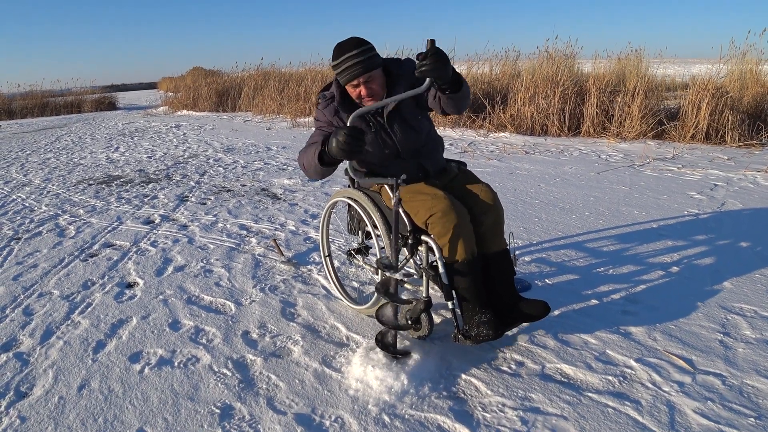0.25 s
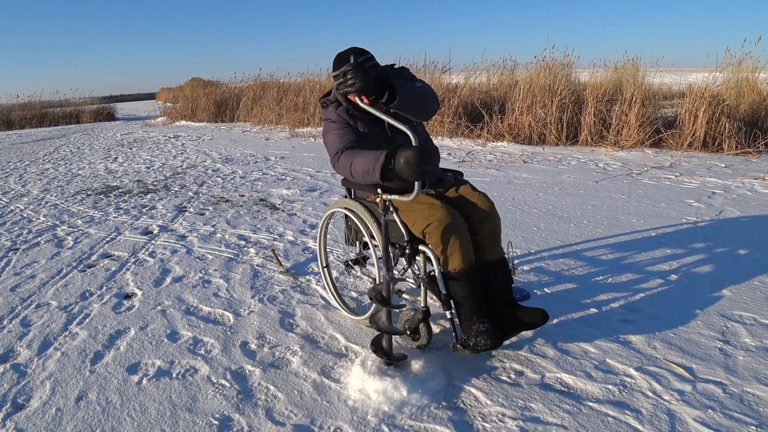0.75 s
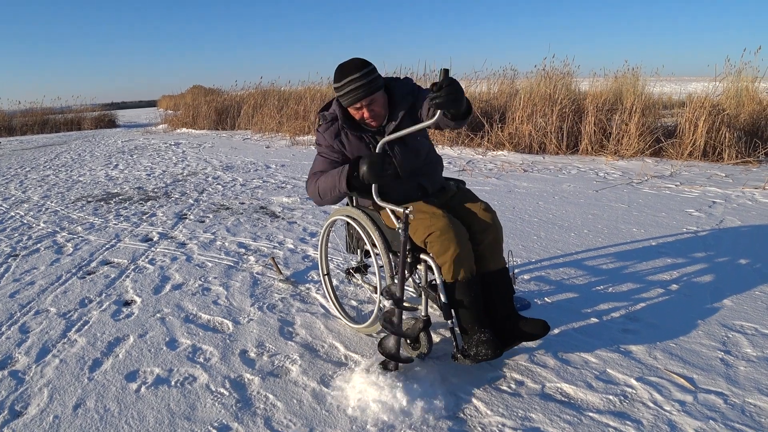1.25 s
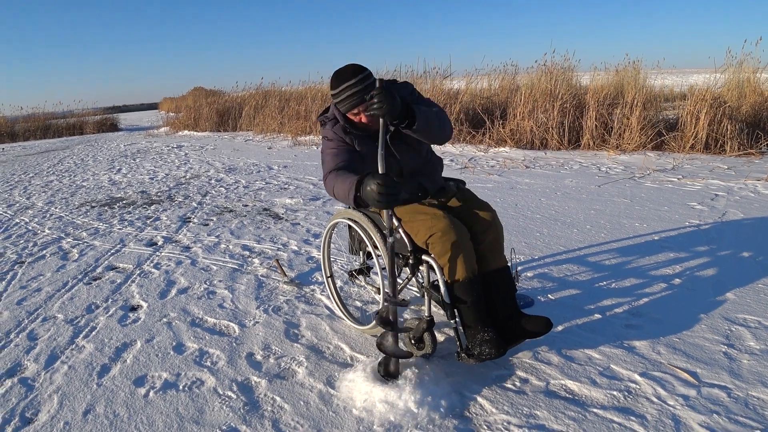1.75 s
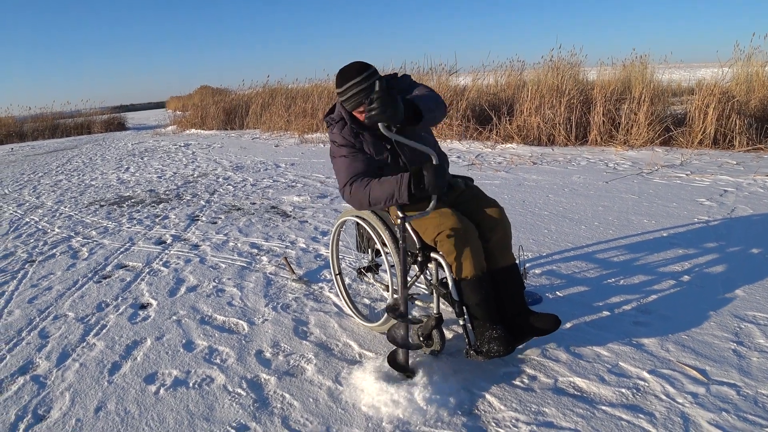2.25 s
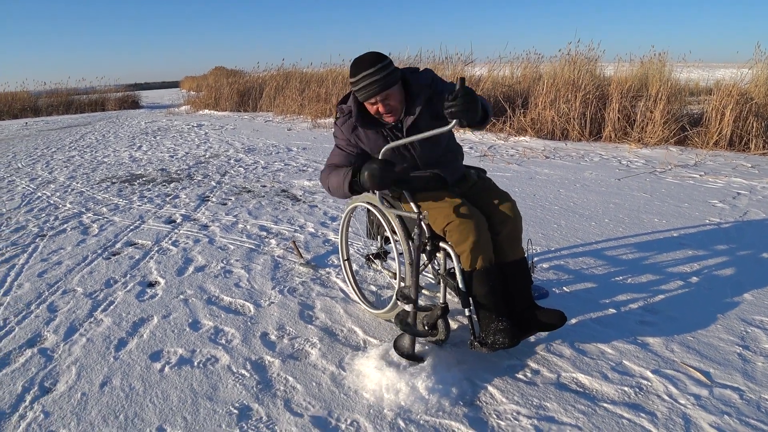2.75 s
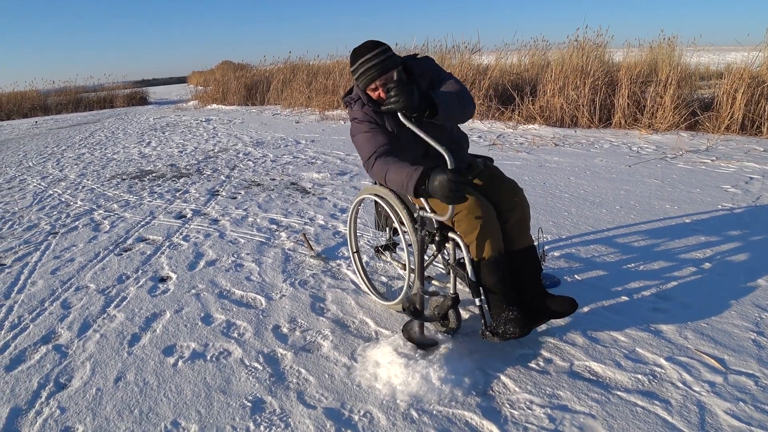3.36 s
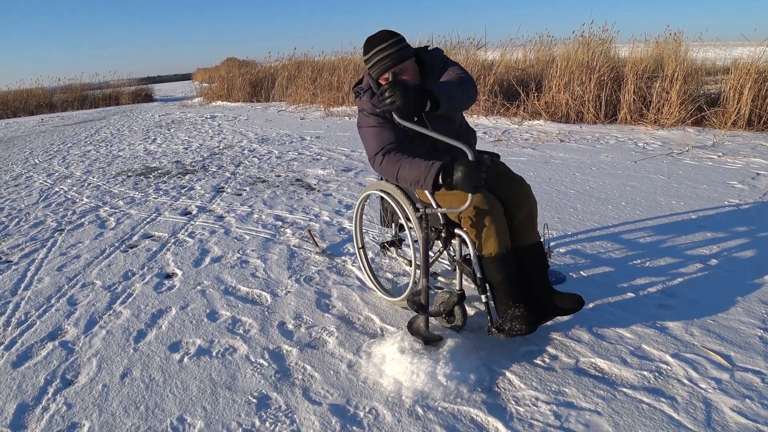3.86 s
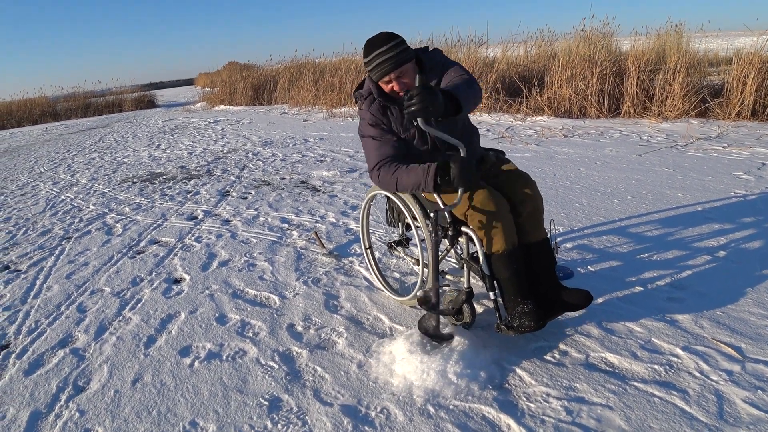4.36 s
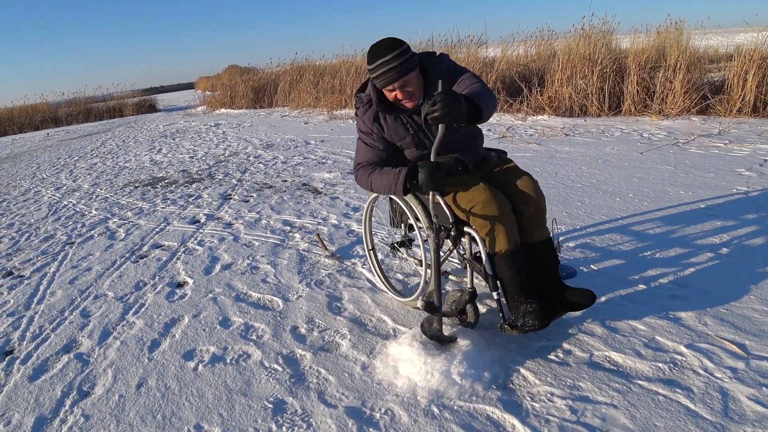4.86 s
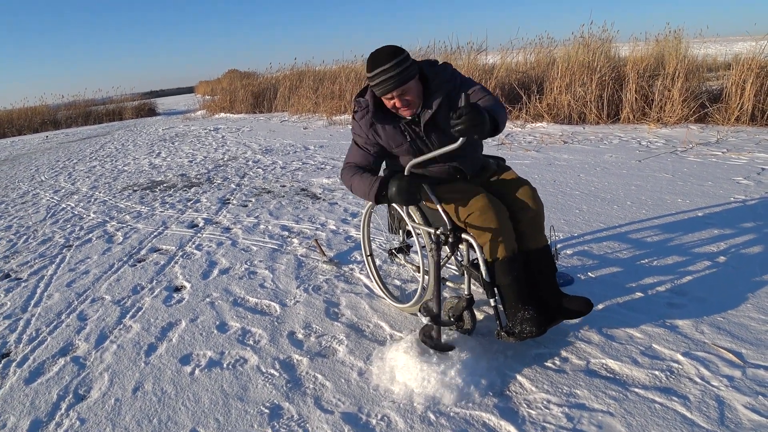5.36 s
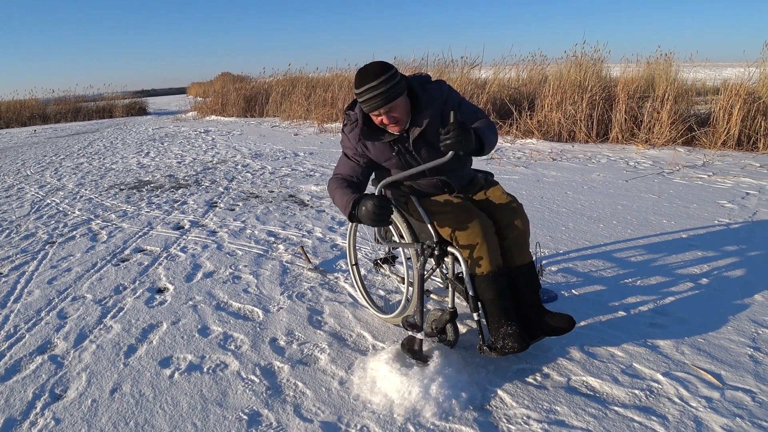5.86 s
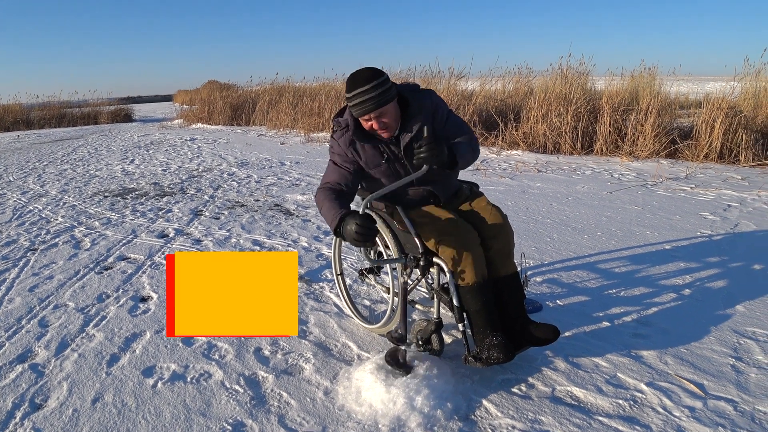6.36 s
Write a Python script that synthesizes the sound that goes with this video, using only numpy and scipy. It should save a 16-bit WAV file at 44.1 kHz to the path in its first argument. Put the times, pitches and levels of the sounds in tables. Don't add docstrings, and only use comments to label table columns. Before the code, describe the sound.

A hand-cranked auger cuts thick river ice in the open, heard dry from a few steps away, nearly centred. From 0 s a dense, heavy scrape is already running: thousands of tiny fractures merging into gritty crunch, with hollow metallic resonance around 1-2 kHz, brighter crackle at 3-7 kHz and airy ice-dust hiss above. It pulses gently every 0.3-0.5 s as a blade passes, with uneven bites and slips. Faint handling bumps sit near 0, 0.7, 2.3 and 6 s. Larger snaps grow from about 1.8 s, strongest between 2.9 and 4.7 s, while a low hum and rumble underlie the strokes. The image leans slightly aside, most near 4.7 s. Breaking ice clusters thickly around 4.2-5.2 s; crisp splinters tick loudest near 5.55 s. Around 6 s chips crowd the hole, lowering its ringing note, with more crunching. Grinding continues to the end at 6.6 s.

```python
import sys
import numpy as np
from scipy import signal
from scipy.fft import rfft, irfft, next_fast_len
from scipy.io import wavfile
from scipy.ndimage import uniform_filter1d, minimum_filter1d, map_coordinates

SR = 44100
rng = np.random.default_rng(int(sys.argv[2]) if len(sys.argv) > 2 else 0)


def unload_audio(sound):
    columns = np.transpose(np.atleast_2d(sound))
    steps = np.round(np.clip(columns, -1, 1) * 32767)
    wavfile.write(sys.argv[1], SR, steps.astype(np.int16))


def boost(x):
    u = np.asarray(x, float) / 20
    return 10 ** u


N = 291501

# t/s, peak level/dB, f/Hz
SNAPS = [(0.3426, -18, 5940), (0.4207, -18, 3930), (0.628, -21, 6100), (0.786, -18, 5300),
         (0.97, -14, 5250), (1.11, -22, 5820), (1.293, -15, 3800), (1.393, -13, 5280), (1.845, -9, 4950),
         (1.8612, -17, 5460), (2.117, -13, 5060), (2.4244, -21, 3880), (2.4543, -11, 6000),
         (2.711, -12, 5700), (2.813, -14, 5950), (2.9398, -7, 5170), (3.1634, -18, 6630), (3.348, -8, 5030),
         (3.794, -7, 4780), (3.8306, -19, 4040), (4.182, -13, 5730), (4.249, -8, 5150), (4.685, -6, 4870),
         (5.087, -13, 5460), (5.2344, -21, 6340), (5.7657, -16, 4410), (5.799, -14, 4470),
         (6.0196, -20, 5950), (6.406, -19, 4660), (6.4284, -18, 5980)]
# f/Hz, width/Hz, level/dB shallow, level/dB halfway, level/dB deep, share of the blade swell [1]
SCREW_MODES = [(847, 132, -2.5, -3, 0.5, -0.058), (1017, 61, -3, -5, -1, -0.067),
               (1295, 98, 4, -1.5, -4, -0.076), (1576, 170, -3, 3, -0.5, -0.13),
               (1723, 235, -9, 2.5, 0, -0.94), (1945, 150, 4, 3.5, 5.5, 0.47), (2012, 280, -9, -1, 1.5, 1),
               (2870, 500, -19, 0, 6, 0.31), (3140, 530, -10, -4, -8.5, -0.65)]
FLIGHT_MODES = [(3380, 530, 4, -4, -4, 0.24), (3890, 260, 7.5, -5, -2, 0.13), (4410, 520, -7, 0, 5.5, 0.41),
                (4780, 390, -9, 3.5, 6.5, 0.054), (5370, 240, -5.5, 0.5, 1, -0.059),
                (5950, 310, 5, 3.5, 8, 0.19), (6510, 140, 0.5, -4, -1, -0.098),
                (7110, 570, -1, -10, -22, 0.19), (8550, 240, -11, -2, -12, 0.51)]
SHAFT_MODES = [(455.3, 31.6, 0, -6.5, -5.5, 0), (514.5, 77, -8, -4, -7.5, 0), (617, 44, -12, -4.5, -5, 0)]
HOLE, BLADE = (1147, 98), (2304, 226)  # f/Hz, width/Hz of each of two passes
# f/Hz, level/dB
BARE_CUT = [(300, -18), (400, -16), (700, -14), (1200, -4.5), (2500, 0), (3300, -15), (6500, -20.5),
            (9000, -32), (11500, -25), (15500, -51.5)]
# f/Hz, level/dB per Hz
SHEET_RUMBLE = [(40, -70), (85, -19), (130, -6.5), (190, -2), (240, 1.5), (320, -9), (420, -55)]
# f/Hz, left minus right level/dB
PORTS = [(100, 0), (200, -.4), (380, -1.7), (700, -1.9), (1290, -1.1), (1800, -.8), (2500, -2.6),
         (4400, -.7), (6000, -.9), (8120, -.3), (15000, 0)]
# f/Hz, level/dB under the centre
SCATTER = [(100, -40), (300, -31), (500, -23), (1800, -31), (2500, -21), (4500, -27), (5800, -21),
           (7000, -26), (8000, -20.5), (9500, -27), (11000, -16.5), (13000, -20)]
# t/s, share of the port balance [1]
PAN = [
    (0, .7),
    (2.5, .9),
    (4.7, 1.35),
    (5.6, .95),
    (6.61, .9),
]
# f/Hz, level/dB per Hz
DUST_HISS = [(4410, -13.5), (7500, -3), (10400, -7.5), (12500, -15.5), (14700, -14), (15600, -17)]
# t/s, peak level/dB, f/Hz
SPLINTERS = [(0.0513, -14.5, 8800), (0.4539, -11, 8560), (0.86, -14, 8800), (1.0111, -21, 8130),
             (1.027, -12, 8180), (1.3583, -10, 8260), (1.5259, -21, 8550), (1.8397, -21, 8070),
             (2.536, -10, 8360), (3.7045, -13, 8160), (4.2812, -18, 8870), (4.338, -22, 9000),
             (4.4074, -12, 8030), (4.5027, -14, 8960), (4.798, -12, 8900), (4.8274, -11, 9010),
             (5.2355, -26, 8600), (5.5515, -7, 9800), (5.568, -5, 9000), (5.689, -17, 8800),
             (5.9594, -16, 8900), (0.1331, -14, 10000), (2.1096, -17, 10500), (2.4284, -18, 10200),
             (3.047, -18, 9000), (3.9619, -14, 10900), (6.12, -21, 11000), (6.318, -22, 11400),
             (6.4083, -19, 9400)]
TOP_HZ = 15730
# t/s, jump level/dB
PLATES = [(0.053, 2), (0.0674, 10), (0.311, 13), (0.361, 9), (0.3766, 7), (0.5473, 6), (0.785, 7),
          (0.8605, 6), (1.0451, 6), (1.234, 5), (1.333, 8), (1.4322, 2), (1.4447, 7.5), (1.527, 2),
          (1.539, 4), (1.768, 5), (1.7765, 5), (1.989, 9), (2.3317, 1), (2.7554, 14), (2.7702, 7),
          (2.8276, 12), (2.8909, 4), (2.9567, 11), (3.016, 13), (3.1823, 5), (3.2875, 7), (3.3614, 13),
          (3.5839, 4), (3.718, -4), (3.8612, 8), (3.8925, 8), (4.127, 2), (4.226, 4), (4.2414, 5),
          (4.282, 15), (4.3012, 9), (4.3307, 4), (4.3401, 3), (4.408, 8), (4.487, 7), (4.5033, 2),
          (4.5316, 9), (4.7158, 12), (4.7512, 9), (4.787, 12), (4.9852, 7), (5.059, -2), (5.116, 13),
          (5.1593, 10), (5.1744, 15), (5.3453, 1), (5.6896, 8.4), (5.96, 13), (5.9967, 8), (6.029, 12),
          (6.0433, 8), (6.078, 16.5), (6.1211, 6.8), (6.2817, 1)]
# t/s, share of the lower tuning [1]
HOLE_SAG = [
    (0, 0.46),
    (4.5, 0.21),
    (5.2, 0.5),
    (5.7, 0.4),
    (6.05, 0.8),
    (6.25, 0.52),
    (6.6, 0.58),
]
SAG_HZ = 55
# lower f/Hz, upper f/Hz
PARTS_HZ = [(640, 950), (1300, 2150), (2700, 4000)]
# t/s, swell level/dB
HEEL_SWELLS = [(0.07, -6), (0.289, -0.5), (0.579, 4), (0.783, -3), (1.003, 4), (1.442, -2), (1.741, -3),
               (1.99, 3), (2.619, -7.4), (3.288, 6.8), (3.532, -4), (3.702, 5.5), (3.901, -5), (4.106, 1.5),
               (4.55, 5), (4.684, 2), (5.248, -4.5), (5.692, -9), (5.882, 4.5), (6.146, -11)]
WAIST_SWELLS = [(0.07, -2), (0.165, 3.5), (0.279, -2), (0.449, 3), (0.693, 0), (0.858, 3.5), (1.197, 4),
                (1.317, -1.7), (1.437, -4), (1.591, 3.5), (1.781, 0.5), (2.21, -1.6), (2.38, 2.5),
                (2.834, -3), (2.953, 4.5), (3.248, -1), (3.372, 4.5), (3.632, -4), (4.146, -5), (4.245, 2.3),
                (4.545, -2.9), (5.073, 1), (5.238, 1), (5.438, -1.5), (5.572, 3), (5.757, -1), (6.031, 4),
                (6.351, 0), (6.54, -1)]
RIM_SWELLS = [(0.584, -2), (1.023, 3.5), (1.152, 4), (1.232, 3), (1.502, -3), (1.576, 4), (1.916, 2.5),
              (2.854, -2), (3.098, 3), (3.168, -8), (3.238, 2.5), (3.417, -2), (3.512, 4), (3.642, 0.5),
              (3.956, -1), (4.031, 6.5), (4.45, 3), (4.689, 3), (4.784, -1), (4.914, 1), (4.994, -4),
              (5.093, 3), (5.268, -1.3), (5.443, -6), (5.632, 1.8), (5.797, 5), (5.897, -3), (6.006, -5),
              (6.276, 2), (6.361, -5), (6.475, 0), (6.61, -6)]
FLIGHT_SWELLS = [(0.09, -6), (0.429, -7), (0.823, -2.5), (1.142, -4.5), (1.237, 2), (1.347, -2),
                 (1.457, 2.0), (1.532, -4), (1.706, -5), (1.786, 2.5), (2.145, 1.5), (2.235, -4), (2.33, 3),
                 (2.554, 0.5), (2.629, -5), (2.759, 3), (3.288, -2), (3.367, 2.5), (3.442, -4.1),
                 (3.921, -4.5), (4.036, 1), (4.34, -4), (4.684, 1), (5.073, 3.5), (5.647, -3), (5.847, 0.5),
                 (6.031, 3), (6.126, -4), (6.321, 3.5), (6.48, 3), (6.61, -2.5)]
SHAFT_SWELLS = [(1.04, 7), (1.29, -5), (1.96, 7), (2.43, 6), (2.62, -5), (2.86, 4), (3.1, -5), (3.19, 5),
                (3.48, -6), (3.94, -9), (5.05, 2.8), (5.45, 4.5), (5.71, -3.8), (5.83, 3.5), (6.27, 4),
                (6.5, -10)]
# t/s, swell level/dB
DUST_DRIFTS = [
    (0.963, -5),
    (2.958, -6),
    (3.492, 2.5),
    (3.826, -4),
    (4.091, -3),
    (5.024, 3.5),
    (5.622, -3),
    (6.036, -3),
    (6.46, 2.8),
    (6.61, 4),
]
HALF_TURNS = [-0.37, 0.04, 0.43, 0.87, 1.28, 1.72, 2.15, 2.5, 2.89, 3.36, 3.74, 4.1, 4.45, 4.74, 5.09, 5.48,
              5.96, 6.39, 6.8]
# t/s, half length/s, coarse cut level/dB, fine cut level/dB
BITES = [(0.24, 0.025, -4.5, -2), (0.572, 0.023, -1, -3.5), (0.87, 0.27, 1, 0.5), (1.116, 0.028, -2, 1),
         (1.363, 0.028, 1.7, 3.5), (1.563, 0.25, -1, -2), (2.046, 0.035, -0.5, -2.5), (2.328, 0.2, 1, 1),
         (2.405, 0.019, -3, -3), (2.462, 0.021, 2.5, 3), (2.585, 0.009, 2.5, 1), (2.836, 0.014, 2.5, 5),
         (2.996, 0.024, -1.5, -3), (3.039, 0.02, 2, 1.5), (3.197, 0.15, -0.3, 0), (3.616, 0.026, 3, 2.5),
         (3.79, 0.023, -0.5, 1.5), (4.237, 0.049, 1, 3.5), (4.293, 0.024, -1.5, -3), (4.502, .058, 1, -1),
         (4.59, 0.02, -1, -3), (4.686, 0.019, 1, 4), (4.905, 0.13, 1.7, -0.8), (5.215, 0.017, -1.5, -4),
         (5.354, 0.048, -0.5, -2.5), (5.575, 0.013, 0, 6.5), (5.655, 0.067, -1.5, -2.5),
         (5.932, 0.021, 0, -4), (6.02, 0.036, 1.5, 3), (6.572, 0.022, 3, -0.5)]
# level/dB shallow, level/dB halfway, level/dB deep
DEPTH = dict(rim=(-30.5, -33, -32.5), scrape=(-23, -23, -24.5), chips=(-23, -26, -27),
         hole=(-39.5, -34, -30), blade=(-34.5, -30.5, -41.5), hum=(-30.5, -33.5, -34),
         rumble=(-55.5, -53, -51.5), dust=(-31, -33.5, -33), bumps=(-74, -73.5, -80))
# swing level/dB per blade pass, its lag [cycles],
# swing level/dB per push and pull of the arms, its lag [cycles]
CRANK = dict(scrape=(0.39, 0.058, .2, 0.25), chips=(0.24, -0.18, 0.23, 0.24),
         hole=(0.3, 0.28, 0.098, -0.21), blade=(0.78, .02, 0.26, 0.61), rim=(0.44, .01, 0.27, 0.12),
         hum=(0.15, -0.26, .15, -0.021), rumble=(.4, .07, 0.27, .32), dust=(0.25, -0.37, 0.25, -0.03),
         bumps=(1.4, .06, .45, .15))
FOLLOWS = dict(rim=(0.78, 0.71), scrape=(1, 0.11), chips=(0.087, 0.98), hole=(0.18, 1), blade=(4.4, -0.46),
           hum=(-0.29, 0.54), rumble=(0.98, -.18), dust=(0.67, 0.14), bumps=(1.28, 1.04))
# t/s, swell level/dB
HOLE_CLEARS = [(0.05, 6), (0.67, 3), (0.98, 4), (1.13, 3), (1.35, -5), (1.52, 6.5), (1.9, 2), (2.15, 7.5),
               (2.28, 7.5), (2.63, 8), (3.0, 6), (3.12, 5.5), (3.36, 5), (3.58, 5), (3.73, 7.5),
               (3.88, 5.5), (4.1, 2), (4.23, 3.5), (4.57, 5), (4.72, 6.5), (4.87, -3), (5.0, 8), (5.14, 9),
               (5.26, 6), (5.39, -5), (5.53, 4), (5.66, 7), (5.89, 4.5), (6.02, 4), (6.16, 3.5), (6.4, 2),
               (6.53, 7.5)]
BLADE_SINGS = [(0.06, 5.1), (0.19, 7.5), (0.3, 8), (0.51, 12), (0.69, 4), (0.91, 8.2), (1.27, 15.6),
               (1.6, 15), (1.73, 11), (2.08, 9.2), (2.55, 4.4), (3.01, 8.4), (3.47, 7.2), (3.97, 7.7),
               (4.1, 3.5), (4.33, 5.6), (5.36, 5.3), (5.94, 7.6), (6.39, 14), (6.48, 5.2)]
SHAFT_SHAKES = [(0.09, 3.0), (0.72, 2.9), (1.07, -9), (1.36, 2), (1.84, -7), (2.04, -10), (2.27, 3.5),
                (2.8, -5), (3.29, 4.5), (4.74, 7), (4.81, 2.8), (4.82, 3.5), (5.07, 7), (5.35, -1),
                (5.49, -7), (5.58, 3.5), (5.91, -8), (6.13, 5)]
SHEET_FLEXES = [(2.34, 5.2), (2.52, 4.1), (2.95, 4.2), (3.28, 5.6), (3.76, 3.6), (4.2, 4.9), (4.64, 8.1),
                (4.81, 3.6), (5.04, 5.2), (5.59, 3.9), (5.95, 3.6)]
DUST_SPRAYS = [(0.46, 2.2), (0.87, 2.5), (1.035, 7.6), (1.22, 4.7), (1.37, 2.5), (1.57, 4.9), (2.11, 2.5),
               (2.48, 6.2), (3.05, 2.5), (3.3, 4.7), (3.72, 6.5), (4.19, 3.5), (4.81, 4.2), (4.93, 2.3),
               (5.09, 4.2), (5.56, 2.6), (6.42, 3.4)]
# t/s, swell level/dB
HANDS_SHIFT = [
    (0.05, 14),
    (0.73, 11.2),
    (1.9, 9),
    (2.33, 11),
    (2.59, 9),
    (6.05, 14),
]
CRACKS = [0.0698, 0.136, 0.3603, 0.3753, 0.424, 0.456, 0.9073, 1.1412, 1.3354, 1.691, 1.7698, 2.1252,
          2.3329, 2.544, 2.5775, 3.288, 3.361, 3.5846, 3.7197, 4.0234, 4.1311, 4.2005, 4.2426, 4.3322,
          4.455, 4.6889, 4.7162, 4.7515, 4.929, 4.9687, 4.9871, 5.1593, 5.1753, 5.237, 5.4213, 5.8084,
          5.8286, 5.9893, 6.0435, 6.2821]
HEEL_S, SWELL_S, CLEAR_S = 0.043, 0.022, 0.046
RING_S, SHAKE_S, FLEX_S, SPRAY_S, SHIFT_S = 0.033, 0.029, 0.048, 0.023, 0.059
KNOCK_DB = -6
CRACK_DB, CRACK_S, CRACK_HZ = -16, .0009, 4600


def blades(breaks):
    scrape_db = loudness('scrape')
    chips_db = loudness('chips', FLIGHT_SWELLS, SWELL_S)
    hole_db = loudness('hole', HOLE_CLEARS, CLEAR_S)
    blade_db = loudness('blade', BLADE_SINGS, RING_S)
    swell_db = blade_db - uniform_filter1d(blade_db, SR // 2)
    coarse = unit(breaks ** 0.26 * shaving(clump_db=0.15, burst_db=1.0, count=2))
    fine = unit(breaks * shaving(clump_db=1.6, burst_db=1.34, count=2))
    force, bare = 0.72 * fine + 0.68 * coarse

    def low(hz):
        return boost(along(BARE_CUT, hz)) / (1 + (hz / 3400) ** 8)

    def high(hz):
        return boost(along(BARE_CUT, hz)) / (1 + (3400 / (hz + 1)) ** 8) / (1 + (hz / 8500) ** 8)

    screw = unit(body(force, SCREW_MODES, swell_db, wander_db=2.0))
    screw += boost(-2.0) * unit(filtered(bare, low))
    screw += boost(-8.5) * shards(count=3500, centre_hz=2000, spread=0.293, cycles=2.7, size_db=1.0)
    flight = unit(body(fine[0], FLIGHT_MODES, swell_db, wander_db=3.0))
    flight += boost(-2.0) * unit(filtered(fine[1], high))
    flight += boost(-6.0) * shards(count=6000, centre_hz=5260, spread=0.2964, cycles=9.4, size_db=3.0)
    flight = filtered(flight, lambda hz: 1 / (1 + (2800 / (hz + 1)) ** 6))

    sag = (curves(HOLE_SAG)[0] + 0.17 * wobble(18)).clip(0, 1)
    low_hole = (HOLE[0] - SAG_HZ, HOLE[1])
    hole = (1 - sag) * ring(ring(coarse[0], *HOLE), *HOLE)
    hole += sag * ring(ring(coarse[0], *low_hole), *low_hole)
    blade = ring(ring(force, *BLADE), *BLADE)
    rings = steady(hole, hole_db - .6, parts=20) - steady(blade, blade_db - 5.0, parts=16)

    cut = steady(mottled(screw, patchy_db=2.0), scrape_db - .4, parts=22)
    cut += steady(breaks ** 0.075 * mottled(flight, patchy_db=2.5), chips_db - .3, parts=18)
    heel, waist, rim = band(cut, PARTS_HZ)
    rest = cut - heel - waist - rim
    loaded = heel * boost(swells(HEEL_SWELLS, HEEL_S)) + waist * boost(swells(WAIST_SWELLS, SWELL_S))
    return rest + loaded + steady(rim, loudness('rim', RIM_SWELLS, SWELL_S), parts=18) + rings


def body(force, modes, swell_db, wander_db):
    depth = np.arange(N) / N
    total = 0
    for k, (hz, width_hz, *depth_db, share) in enumerate(modes):
        level_db = np.interp(depth, [0, .5, 1], depth_db) + share * swell_db
        total = total + (-1) ** k * ring(force, hz, width_hz) * boost(level_db + wander_db * wobble(9))
    return total


def shaving(clump_db, burst_db, count=1):
    noise = rng.standard_normal((count, N))
    clumps = 1.22 * wobble(22) + wobble(45)
    return unit(noise * boost(clump_db * clumps + burst_db * wobble(260)))


def crunch(count, size, life_s):
    draw = rng.random((count, 2))
    kicks = size * np.bincount((draw[:, 0] * N).astype(int), np.minimum(-np.log(draw[:, 1]), 1.6), N)
    s, jump_db = np.transpose(PLATES)
    kicks[(s * SR).astype(int)] += boost(jump_db + 1.0) - 1
    t = np.arange(400) / SR / life_s
    return 1 + signal.fftconvolve(kicks, t * np.exp(1 - t))[:N]


def shards(count, centre_hz, spread, cycles, size_db):
    draw = rng.random((count, 3))
    hz = centre_hz * np.exp(spread * rng.standard_normal(count))[:, None]
    i = np.arange(360)
    life = i * hz / SR / cycles
    size = boost(size_db * np.minimum(-np.log(draw[:, 1:2]), 4))
    wave = size * life * np.exp(-life) * np.sin(2 * np.pi * (hz * i / SR + draw[:, 2:]))
    wave = wave * (hz < SR / 2.5)
    at = (draw[:, :1] * N).astype(int) + i
    return unit(np.bincount(at.ravel(), wave.ravel(), N + len(i))[:N])


def mottled(x, patchy_db):
    z = signal.stft(x, nperseg=512)[2]
    field = uniform_filter1d(rng.standard_normal(z.shape), size=3, axis=0)
    field = uniform_filter1d(field, size=5, axis=1)
    return signal.istft(z * boost(patchy_db * unit(field)), nperseg=512)[1][:N]


def snaps():
    out, t = np.zeros(N + 1024), np.arange(1024) / SR
    envelope = (1 - boost(-60 * t / 0.0051)) * boost(-60 * t / 0.032)
    for s, db, hz in SNAPS:
        burst = rng.standard_normal((2, len(t))) * envelope
        bright = signal.lfilter(*signal.iirpeak(hz, 4.5, SR), burst[0])
        knock = signal.lfilter(*signal.iirpeak(1700, 1.5, SR), burst[1])
        snap = bright / np.abs(bright).max() + boost(KNOCK_DB) * knock / np.abs(knock).max()
        out[round(s * SR):][:len(t)] += boost(db + 2.5) * snap
    return out[:N]


def cracks():
    t = np.arange(-256, 256) / SR
    tone = signal.iirpeak(CRACK_HZ, 1, SR)
    noise = rng.standard_normal((len(CRACKS), len(t)))
    burst = signal.lfilter(*tone, signal.lfilter(*tone, noise))
    burst = burst * np.exp(-.5 * (t / CRACK_S) ** 2)
    burst = burst / np.sqrt(np.sum(burst ** 2, axis=1, keepdims=True) / (2 * CRACK_S * SR))
    at = ((np.reshape(CRACKS, (-1, 1)) + t) * SR).round().astype(int)
    return boost(CRACK_DB) * np.bincount(at.ravel(), burst.ravel(), N)[:N]


def powder(breaks):
    hiss = unit(breaks ** 0.8 * shaving(clump_db=1.0, burst_db=-0.8)[0])
    hiss += boost(-13.0) * shards(count=4000, centre_hz=10340, spread=0.217, cycles=4.7, size_db=0.5)
    hiss = mottled(filtered(hiss, lambda hz: boost(along(DUST_HISS, hz))), patchy_db=3.0)
    level_db = loudness('dust', DUST_SPRAYS, SPRAY_S) + swells(DUST_DRIFTS, SWELL_S)
    far_dust = filtered(rng.standard_normal(N), lambda hz: 1 / (1 + (12000 / (hz + 1)) ** 8))
    out = np.pad(steady(hiss, level_db - .6, parts=16) + boost(-52.0) * unit(far_dust), (0, 512))
    t = np.arange(512) / SR
    envelope = (1 - boost(-60 * t / 0.0063)) * boost(-60 * t / 0.011)
    for s, db, hz in SPLINTERS:
        burst = rng.standard_normal(len(t)) * envelope
        tick = ring(ring(burst, hz, hz / 2.0), hz, hz / 2.0)
        out[round(s * SR):][:len(t)] += boost(db - 2.5) * tick / np.abs(tick).max()
    return out[:N]


def ice():
    hum_db, rumble_db = loudness('hum'), loudness('rumble', SHEET_FLEXES, FLEX_S)
    hum = body(shaving(clump_db=1.26, burst_db=1.0)[0], SHAFT_MODES, 0, wander_db=0.8)
    hum = unit(filtered(hum, lambda hz: 1 / (1 + (385 / (hz + 1)) ** 7.8) / (1 + (hz / 900) ** 3)))
    upper = filtered(hum, lambda hz: 1 / (1 + (525 / (hz + 1)) ** 20))
    lower = hum - upper

    def own_db(x):
        return 10 * np.log10(np.abs(uniform_filter1d(x ** 2, SR)) + 1e-12)

    low = steady(lower, own_db(lower) + swells(SHAFT_SHAKES, SHAKE_S), parts=9)
    high = steady(upper, own_db(upper) + swells(SHAFT_SWELLS, SHAKE_S), parts=9)
    rumble = filtered(rng.standard_normal(N), lambda hz: boost(along(SHEET_RUMBLE, hz)))
    return boost(hum_db - own_db(hum) + 0.4) * (low + high) + steady(rumble, rumble_db)


def bumps():
    noise = rng.standard_normal(N) * boost(8 * wobble(16))
    lumps = filtered(noise, lambda hz: hz / (hz + 15) / (1 + (hz / 85) ** 4))
    return boost(loudness('bumps', HANDS_SHIFT, SHIFT_S) + 1.5) * steady(lumps, 0, parts=4)


def loudness(layer, own=((0, 0),), half_s=1):
    s, length, coarse_db, fine_db = np.transpose(BITES)
    t, bite = bells(s, length)
    passes = np.interp(t, HALF_TURNS, np.arange(len(HALF_TURNS)))
    pass_db, pass_lag, arm_db, arm_lag = CRANK[layer]
    coarse_share, fine_share = FOLLOWS[layer]
    db = np.interp(t * SR / N, [0, .5, 1], DEPTH[layer])
    db = db + pass_db * np.cos(2 * np.pi * (passes - pass_lag))
    db = db + arm_db * np.cos(2 * np.pi * (2 * passes - arm_lag))
    db = db + (coarse_share * coarse_db + fine_share * fine_db) @ bite
    return np.interp(np.arange(N) / SR, t, db) + swells(own, half_s)


def swells(rows, half_s):
    at, swell_db = np.transpose(rows)
    t, bell = bells(at, half_s)
    return np.interp(np.arange(N) / SR, t, swell_db @ bell)


def bells(times, half_s):
    t = np.arange(0, N + 64, 64) / SR
    away = (t - np.reshape(times, (-1, 1))) / np.reshape(np.abs(half_s), (-1, 1))
    return t, np.exp(-.5 * away ** 2)


def steady(x, level_db, parts=7):
    return x * boost(level_db) / np.sqrt(np.abs(uniform_filter1d(x ** 2, SR // parts)) + 1e-12)


def ring(x, hz, width_hz):
    return unit(signal.lfilter(*signal.iirpeak(hz, hz / width_hz, SR), x))


def band(x, edges_hz):
    low, high = np.transpose(edges_hz)[..., None]
    return filtered(x, lambda hz: 1 / (1 + (low / (hz + 1)) ** 20) / (1 + (hz / high) ** 20))


def filtered(x, response):
    m = next_fast_len(N + 8192)
    return irfft(rfft(x, m) * response(np.fft.rfftfreq(m, 1 / SR)), m)[..., :N]


def wobble(rate):
    step = np.arange(0, N + 16, 16)
    knots = rng.standard_normal(int(N * 400 / SR) + 4)
    coarse = map_coordinates(knots, [step * min(rate, 400) / SR])
    return np.interp(np.arange(N), step, coarse)


def curves(rows):
    s, *cols = np.transpose(rows)
    return [np.interp(np.arange(N) / SR, s, c) for c in cols]


def along(points, hz):
    f, v = np.transpose(points)
    return np.interp(np.log(hz + 1), np.log(f + 1), v)


def unit(x):
    return x / np.sqrt(np.mean(x ** 2) + 1e-20)


def scene():
    breaks = crunch(count=650, size=.7, life_s=.0008)
    cutting = blades(breaks) + snaps() + cracks() + powder(breaks)
    auger = filtered(cutting, lambda hz: 1 / (1 + (330 / (hz + 1)) ** 4)) + ice()
    z = signal.stft(auger, nperseg=256)[2]
    scattered = signal.istft(z * np.exp(2j * np.pi * rng.random(z.shape)), nperseg=256)[1][:N]
    unlike = filtered(scattered, lambda hz: boost(along(SCATTER, hz) + 4.5))
    lean = filtered(auger, lambda hz: np.tanh(along(PORTS, hz) * np.log(10) / 40))
    side = (lean + unlike) * curves(PAN)[0]
    return np.array([auger + side, auger - side]) + bumps()


def top_cut(x):
    return signal.sosfilt(signal.butter(12, 15730, fs=SR, output="sos"), x)


def record(dry):
    needed = np.minimum(1, .38 / (np.abs(dry).max(0) + 1e-9))
    gain = uniform_filter1d(minimum_filter1d(needed, size=181), size=91)
    mix = filtered(dry * gain, lambda hz: hz < TOP_HZ)
    return top_cut(mix)


dry = scene()
out = record(dry)
unload_audio(out)
```